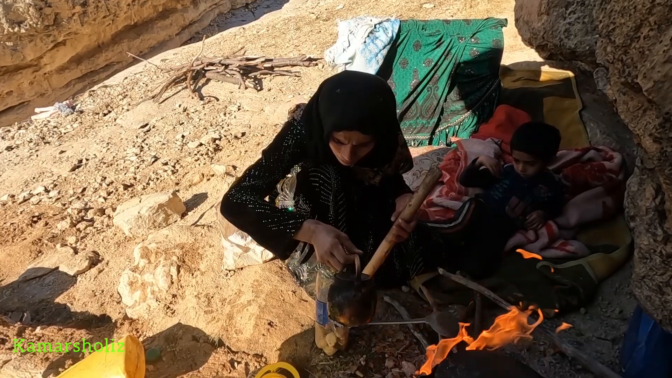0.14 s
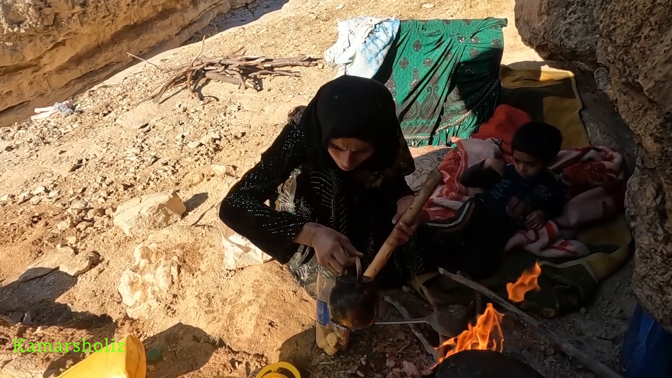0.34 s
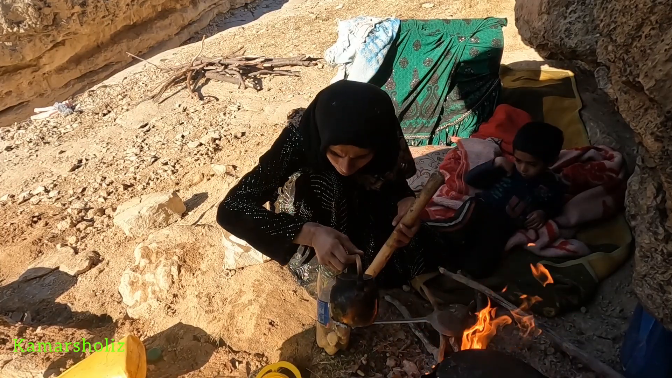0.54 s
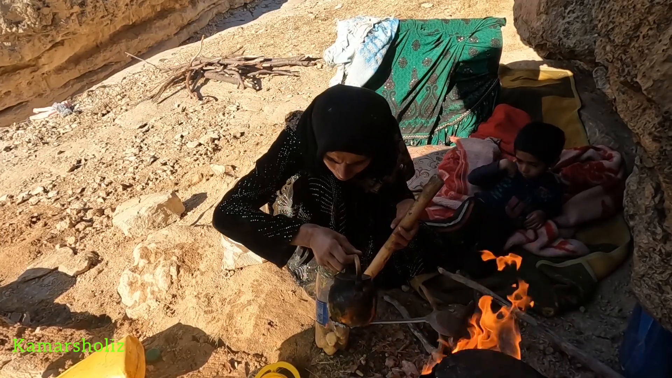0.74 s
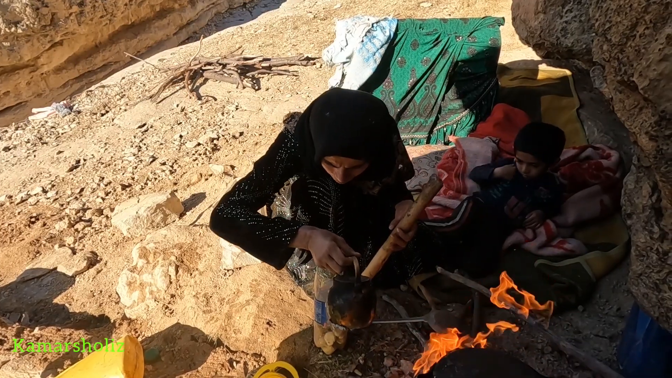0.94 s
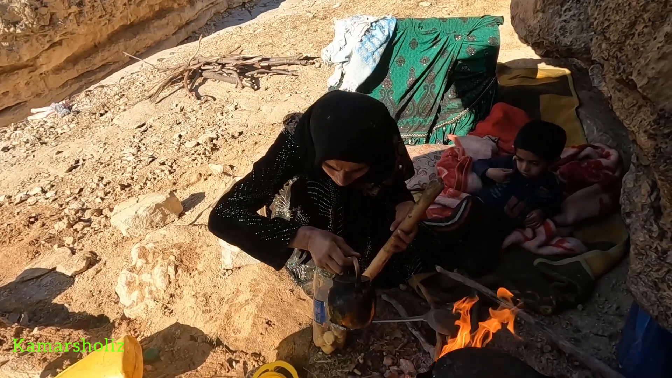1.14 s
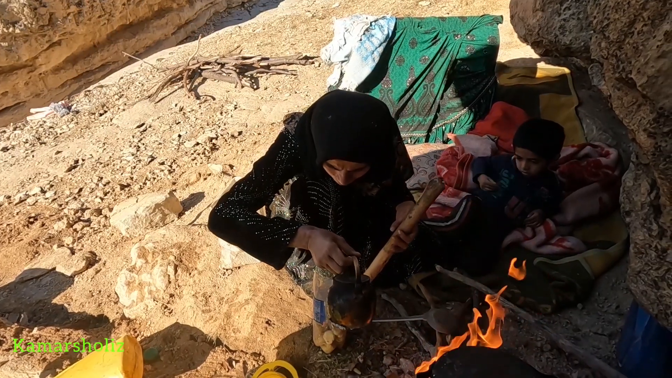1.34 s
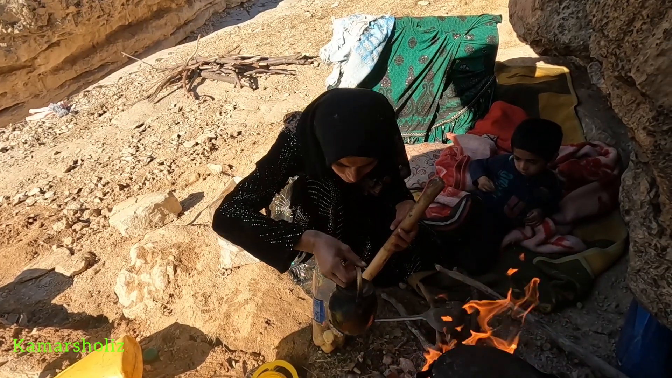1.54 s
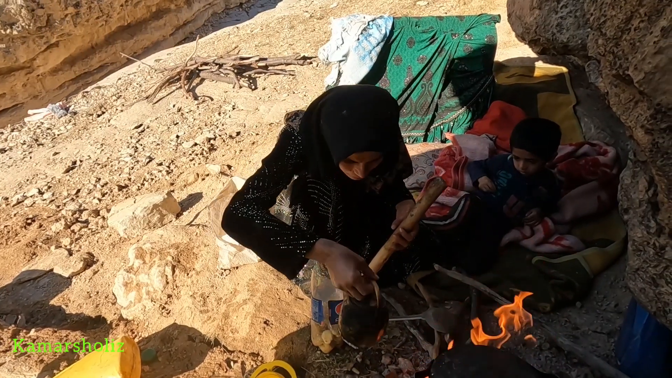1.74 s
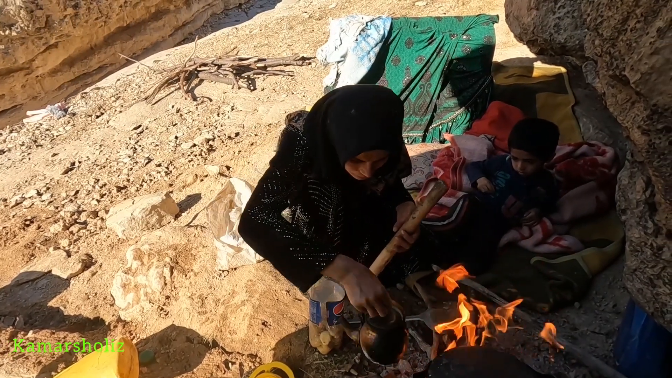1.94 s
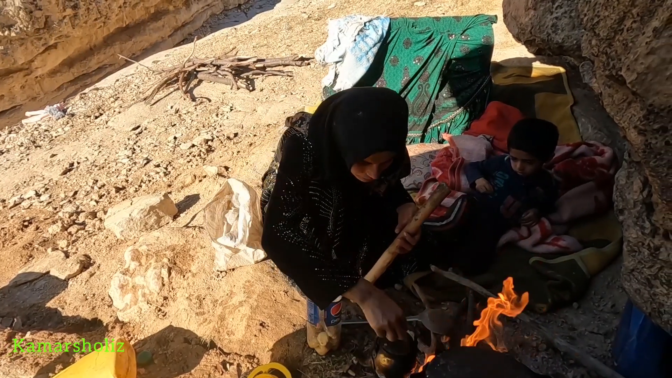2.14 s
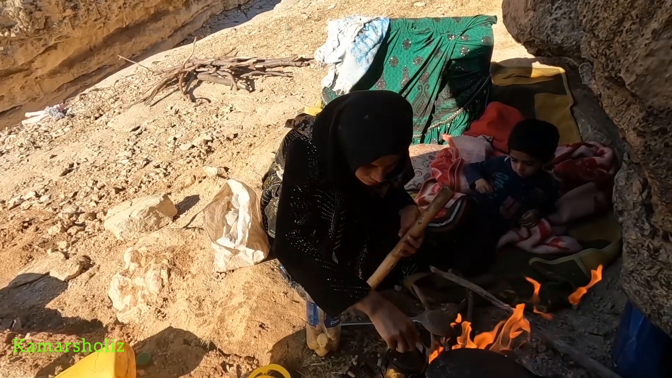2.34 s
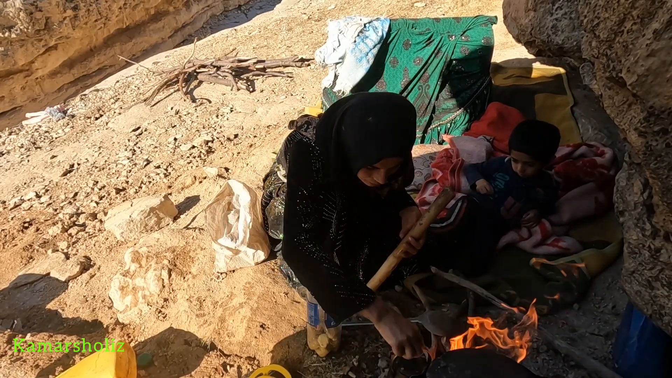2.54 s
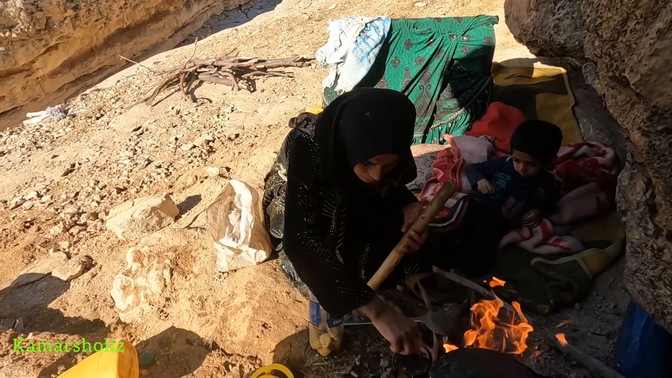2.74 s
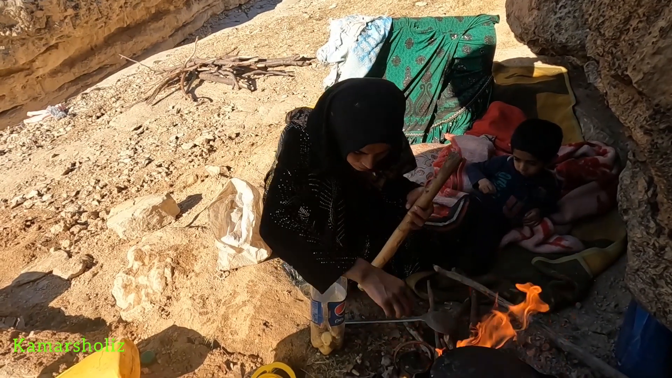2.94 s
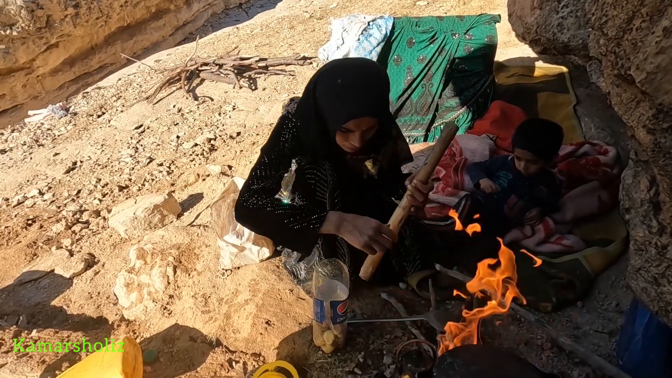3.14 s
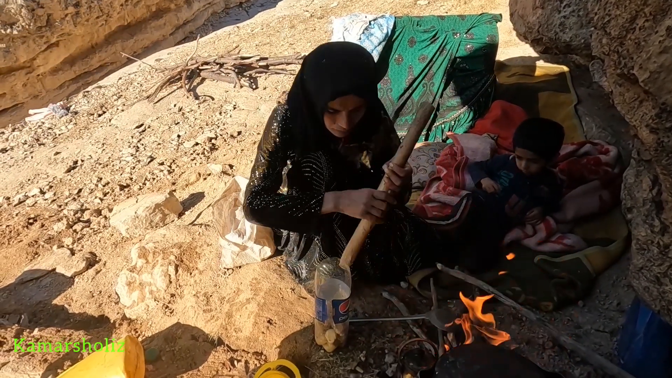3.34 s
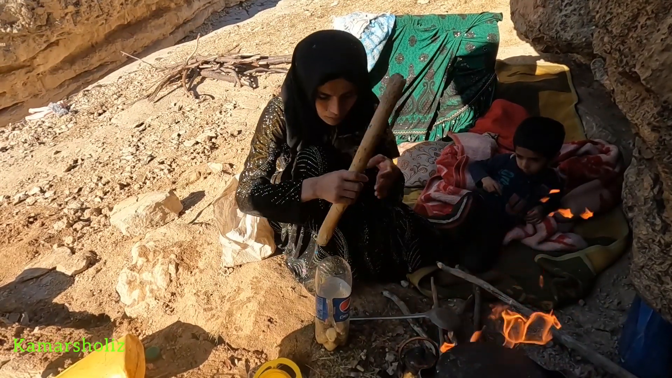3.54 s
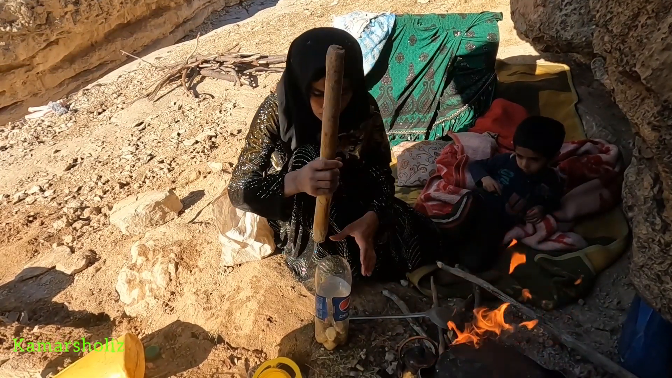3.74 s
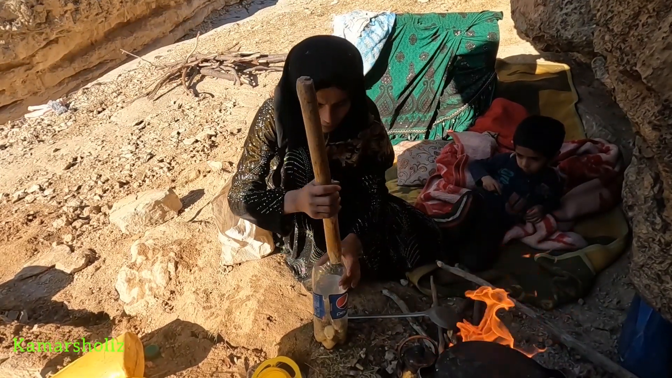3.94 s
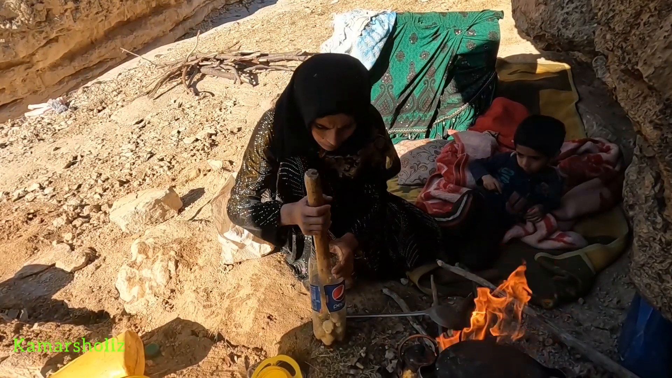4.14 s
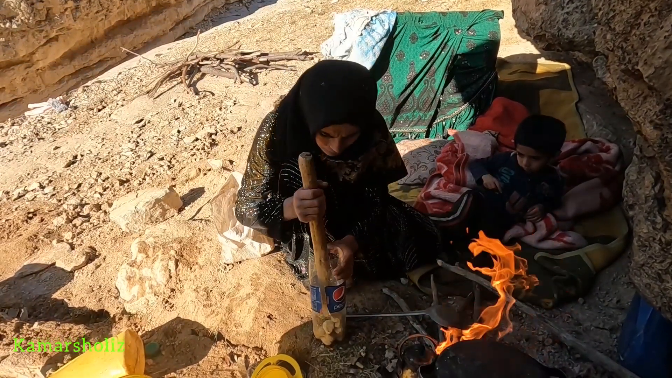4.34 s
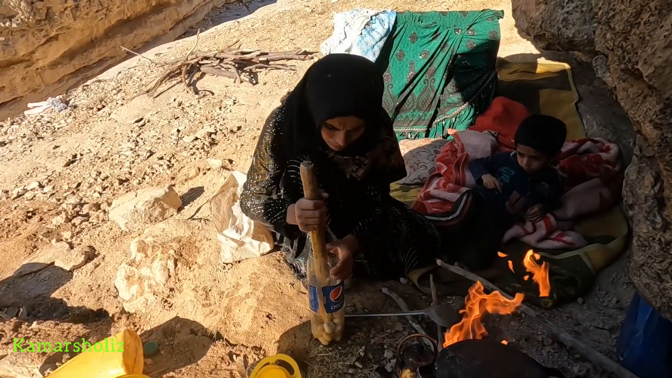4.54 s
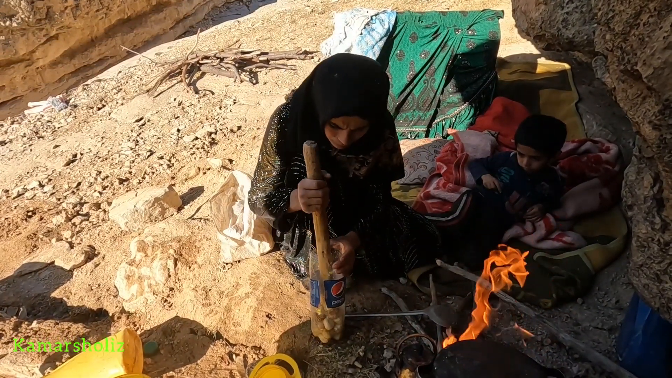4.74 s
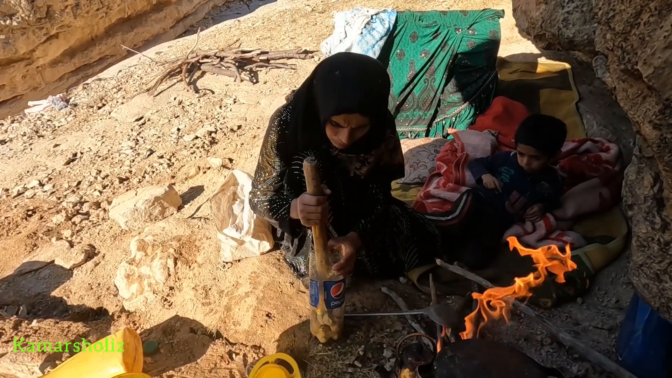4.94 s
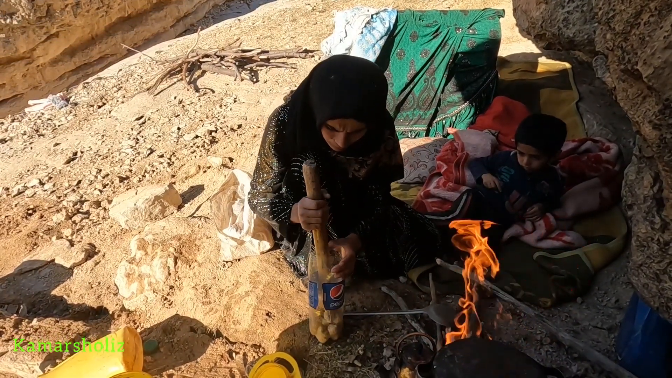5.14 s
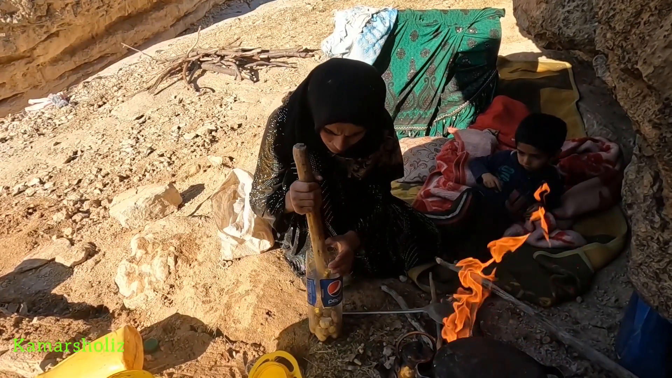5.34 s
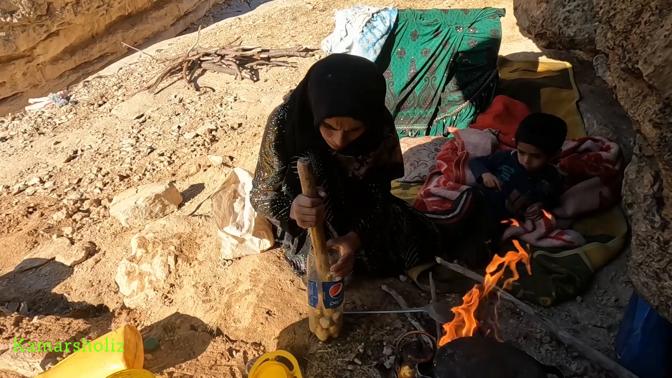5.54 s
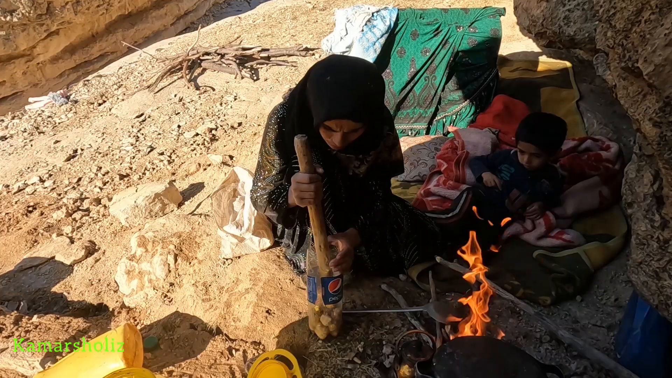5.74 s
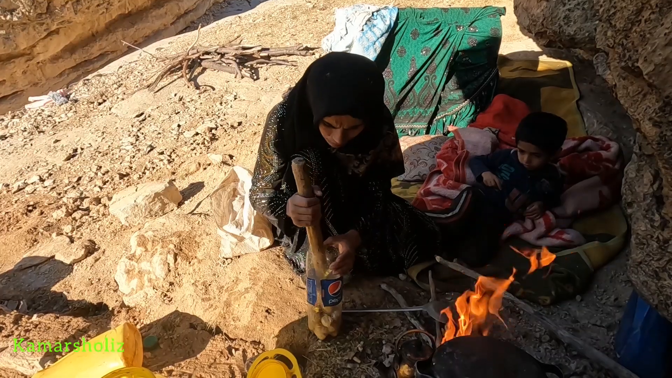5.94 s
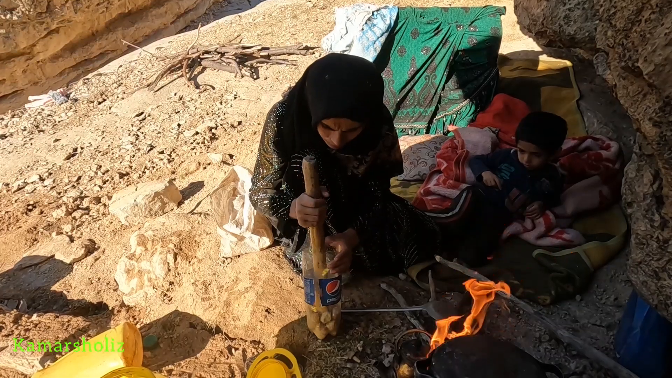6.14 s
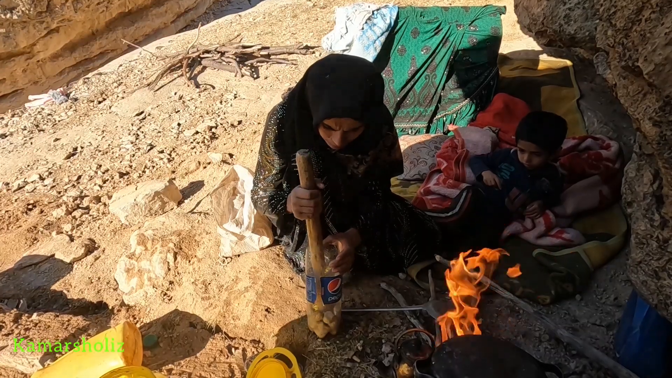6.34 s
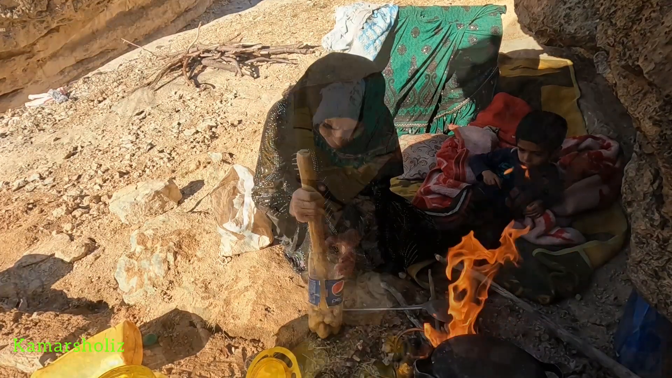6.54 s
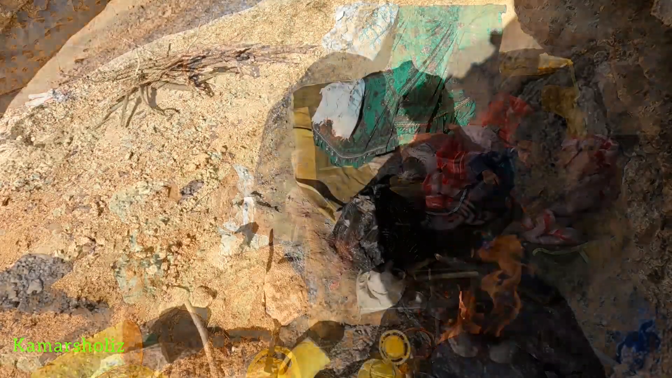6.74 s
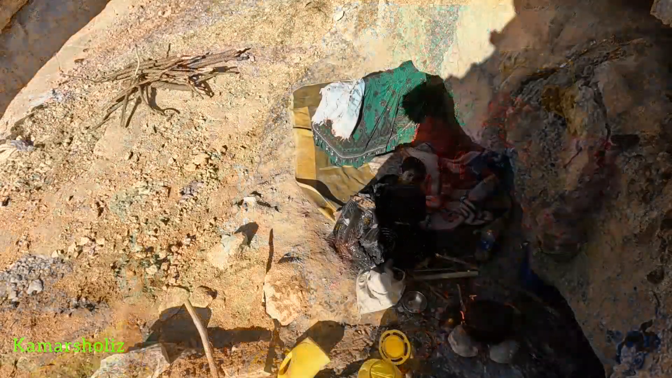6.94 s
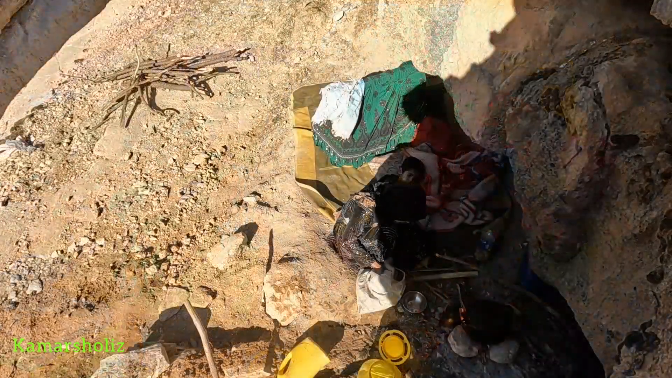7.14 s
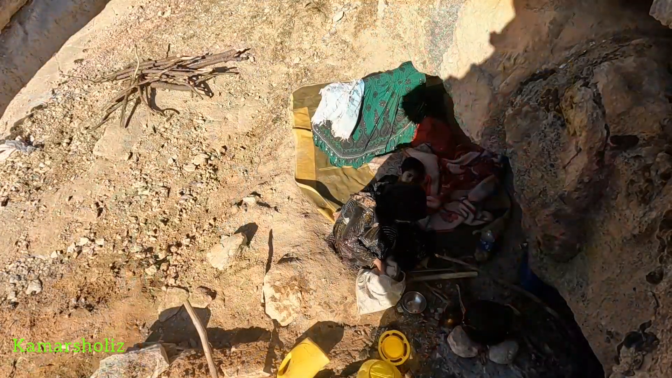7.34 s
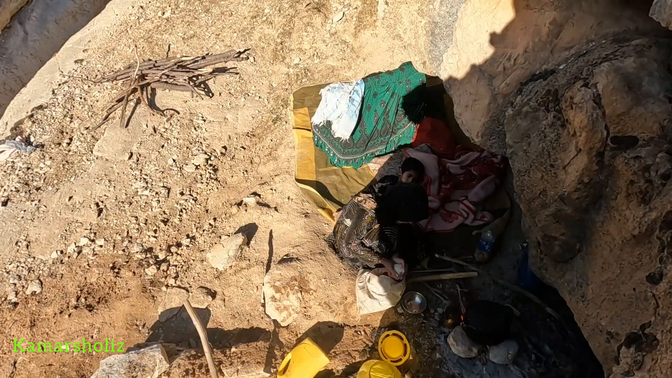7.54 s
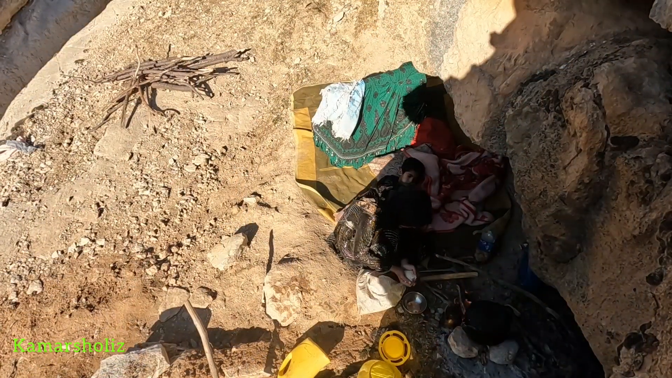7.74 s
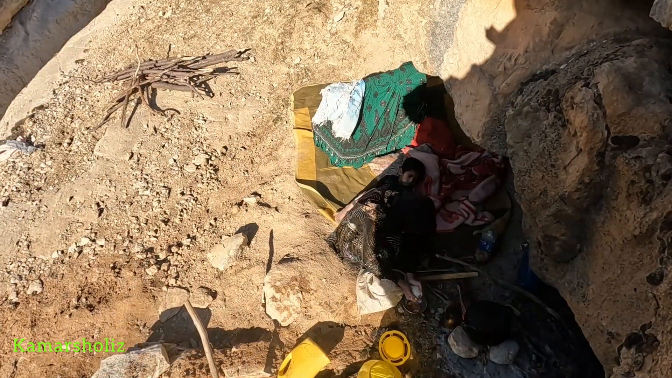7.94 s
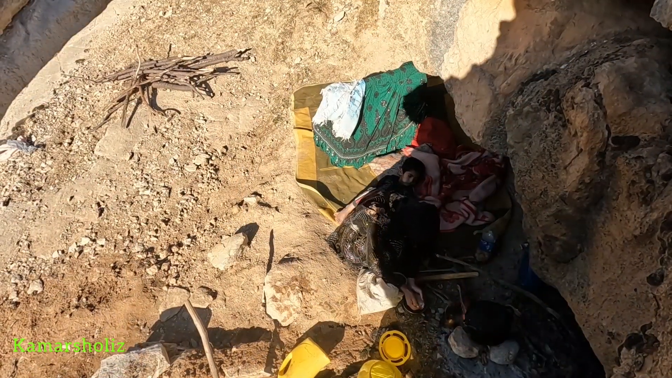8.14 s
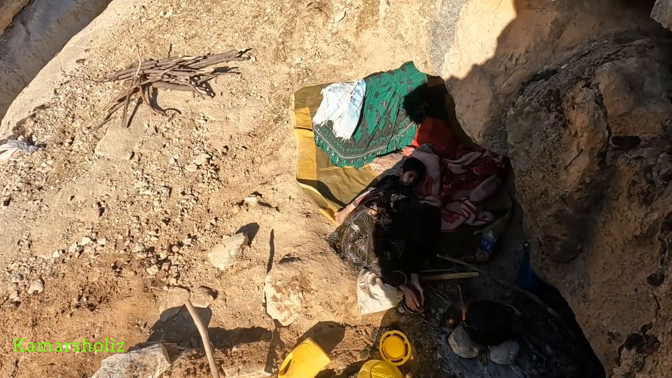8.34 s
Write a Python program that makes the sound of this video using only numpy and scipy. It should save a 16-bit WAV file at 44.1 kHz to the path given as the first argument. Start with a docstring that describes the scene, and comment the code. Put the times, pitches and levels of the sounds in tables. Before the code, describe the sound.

Crumbs and lumps patter from a metal ladle into a plastic bottle, then a wooden stick pounds them in crunchy hollow strokes beside a small fluttering fire.

```python
"""A wooden stick pounds food in a cut-open plastic bottle about three times a second, the last strokes fading.
Each stroke is a cluster of cracks and dense fractures that excite the bottle's wall and air-column resonances.
Before it, lumps and crumbs are tipped from a metal ladle, a shower of short taps; the ladle is put down with a clink.
A small wood fire under a rock overhang is coloured noise with ticks. Near the end the fire is fainter and the stereo
image narrower, with a faint hiss, two swishes of clothing, a dull bump and a dragged pot whose modes grit excites."""
import sys
import numpy as np
from scipy import signal
from scipy.fft import rfft, irfft
from scipy.io import wavfile
from scipy.ndimage import uniform_filter1d

SR = 44100
rng = np.random.default_rng(int(sys.argv[2]) if len(sys.argv) > 2 else 0)


def wav_record(signal):
    """Record a signal, one row per channel, as 16-bit PCM in the file named by sys.argv[1]."""
    frames = np.transpose(np.atleast_2d(signal))
    bounded = np.clip(frames, -1, 1)
    # unit amplitude maps onto the largest positive 16-bit level
    quanta = np.round(bounded * 32767).astype(np.int16)
    wavfile.write(sys.argv[1], SR, quanta)


N = 369558  # length of the scene in samples
SIZE = 4096  # length of impulse responses and short bursts in samples
EDGE_HZ = 15750  # upper limit of the band

# Strength of the fire. Each row: time in seconds, level in dB before FAINTER_DB is added.
FLAME_STRENGTH = [(0, -49), (.62, -40), (1.05, -51), (1.38, -42), (2.1, -49), (2.5, -41.5), (2.62, -33),
                  (2.76, -41), (3.22, -49), (3.42, -47.5), (3.8, -50.5), (3.95, -41), (4.15, -51)]
# Sharp ticks of burning twigs. Each row: time in seconds, peak in dB.
TWIG_TICKS = [(1.3433, -37), (2.917, -47.5), (3.0006, -36), (4.058, -45), (5.316, -36.5), (6.033, -43),
              (6.075, -39.5)]
# Spectra of the fire. Each row: frequency in Hz, relative spectral level in dB.
RUMBLE_COLOUR = [(12, -9), (30, 9), (60, -6), (130, -10.5), (250, -88)]
FLUTTER_COLOUR = [(50, -7.5), (110, 1), (165, 1), (230, -10.5), (370, -8.5), (560, -24.5), (2000, -69)]
HISS_SPECTRUM = [(200, -10), (700, -3), (1900, -4), (3300, -14), (7500, -7), (10700, -26), (12300, -23),
                 (15500, -44)]
# Rumble and hiss at the usual fire strength, and the dB by which each follows one dB of it
USUAL_FLAME_DB, RUMBLE_DB, RUMBLE_FOLLOWS, HISS_DB, HISS_FOLLOWS = -47, -38, 0.6, -70, 0.36
# The fire grows fainter as the stereo image closes: span, change of fire strength, change of the stereo difference
FADE_START_S, FADE_END_S, FAINTER_DB, NARROW_DB = 6.69, 7.07, -15.5, -20.5

# Flow of crumbs from the ladle. Each row: time in seconds, level in dB before POUR_DB is added.
CRUMB_FLOW = [(.04, -58), (.24, -56.5), (.36, -42), (.52, -51.5), (.76, -52), (.92, -46), (1.16, -48),
              (1.36, -46), (1.65, -43), (1.73, -54.5), (1.93, -55)]
POUR_DB, POUR_STOP_DB_PER_S = -5, 183
# Largest lumps dropping into the bottle. Each row: time in seconds, peak in dB, pitch of the tap in Hz.
LARGE_LUMPS = [(.303, -31.5, 2080), (.36, -35.5, 1180), (.376, -33, 1600), (.5715, -41, 4500),
               (.776, -37.5, 1870), (.879, -37.5, 2100), (1.104, -35, 1250), (1.184, -36.5, 3140),
               (1.229, -37.5, 2750), (1.376, -35.5, 1730), (1.459, -31, 980), (1.661, -38, 2280),
               (1.96, -33.5, 4650)]
SMALL_LUMP_COUNT, SMALL_LUMP_DB = 60, 10  # smaller lumps at random, up to this many dB above the flow
DUST_DB = -6.5  # fine dust against the flow
# Crumbs skittering in the ladle: level term, and share of its ring time left while it is held and full
SKITTER_DB, HELD_RING = -29, 0.044
# Modes of the freely ringing ladle bowl. Each row: frequency in Hz, relative level in dB, T60 in seconds.
LADLE_MODES = [(3990, -12, 0.23), (4360, -7, 0.24), (6320, -2, 0.14), (7780, 5.5, 0.087), (8660, 3, 0.08)]
# The ladle put down. Each row: time in seconds, peak of the ring in dB.
LADLE_CLINKS = [(2.8415, -46)]
# Hand and ladle brushing over dry ground. Each row: start in seconds, end in seconds, gain in dB.
GROUND_SCUFFS = [(2.39, 2.48, -61), (2.56, 2.67, -56), (3.37, 3.56, -67), (3.91, 4.1, -65)]
# Spectrum of that brushing. Each row: frequency in Hz, relative spectral level in dB.
SCUFF_SPECTRUM = [(1400, 3.5), (3200, -8), (6500, -0.5), (11000, -21.5)]

# Bottle resonances, the strongest near odd multiples of the air column's lowest note.
# Each row: frequency in Hz, width in Hz, level in dB over the wall sound before any ring_db.
BOTTLE_MODES = [(329.3, 25, 12), (363, 20.2, 18), (676, 30, 3.5), (1031.6, 67, 16), (1717, 73, 6),
                (2005, 52, -0.5), (2322, 100, 0), (2654, 190, 2.5), (3436, 34, 2)]
# Spectrum of the bottle's wall. Each row: frequency in Hz, gain in dB.
WALL_COLOUR = [(40, -3.5), (110, 2.5), (300, -3), (600, -6.5), (1100, -3.5), (2200, 1), (3200, -5.5),
               (4500, -9.5), (8000, -27), (9700, -44.5), (12000, -41.5), (15500, -54.5)]

# Stick scraping past the rim in two shoves. Each row: time in seconds, gain in dB, pitch of the rim in Hz.
RIM_SCRAPE = [(4.106, -97.5, 2150), (4.114, -45, 2260), (4.135, -39.5, 2630), (4.175, -44, 2190),
              (4.195, -31.5, 2230), (4.222, -47, 2200), (4.31, -100, 2200)]
# Resonances of the rim. Each row: multiple of its pitch, width in Hz, gain in dB.
RIM_RESONANCES = [(1, 140, 1.5), (1.95, 258.5, -4)]
# Spectrum of the grit on the rim. Each row: frequency in Hz, relative spectral level in dB.
RIM_GRIT_COLOUR = [(1000, -12.5), (4100, -2), (8000, -10), (10500, -26.5), (15500, -36)]
RIM_GRIT_DB = -5  # against the ringing

# Plastic wall buckling with a snap. Each row: time in seconds, peak in dB, pitch in Hz.
WALL_SNAPS = [(4.202, -22, 4000), (4.2056, -11.5, 4240), (4.44, -33.5, 4570), (4.918, -21, 4390),
              (4.942, -27, 4270)]
# Stick tapping the side as it is lifted. Each row: time in seconds, peak in dB, rebound in dB against the tap.
SIDE_TAPS = [(4.337, -30.5, -12), (4.412, -31, -26.5), (4.485, -36, -23), (4.644, -28.5, -6.5),
             (5.078, -24.5, -1), (5.357, -30.5, -7.5), (5.383, -23.5, -5), (5.992, -21, -8),
             (6.51, -32.5, -19)]
REBOUND_S = 0.0094
# Hollow bumps of the whole bottle. Each row: time in seconds, peak of the air tone in dB, pitch in Hz.
BOTTLE_BUMPS = [(4.441, -32.5, 385), (4.743, -28.5, 357), (4.81, -34, 365), (5.144, -28.5, 366)]
BUMP_RISE_S, BUMP_T60_S = 0.0041, 0.082

# Strokes of the stick into the filling. Each row: start in seconds, length in seconds, grinding level in dB,
# time it bottoms out in seconds, peak of the thud in dB.
STICK_STROKES = [(4.258, 0.023, -25.5, 4.276, -15.5), (4.531, 0.047, -23, 4.555, -19),
                 (4.871, 0.069, -22, 4.9, -18.5), (5.214, 0.068, -22.5, 5.25, -18),
                 (5.537, 0.067, -22.5, 5.555, -17), (5.898, 0.056, -22.5, 5.927, -16.5),
                 (6.254, 0.05, -21, 6.272, -14.5), (6.629, 0.025, -24, 6.634, -24.5),
                 (6.683, 0.043, -31, 6.7, -33.5), (6.996, .032, -36, 7.005, -36.5)]
# Hard pieces breaking under the strokes. Each row: time in seconds, peak in dB, pitch in Hz.
HARD_CRACKS = [(4.26, -16.5, 1550), (4.533, -19, 1700), (4.547, -14.5, 1200), (4.883, -13.5, 1050),
               (4.897, -15, 2000), (5.215, -15, 2050), (5.234, -16.5, 1900), (5.247, -13.5, 1300),
               (5.544, -16.5, 2200), (5.557, -15, 1100), (5.905, -15.5, 1900), (5.924, -13.5, 1350),
               (6.254, -14, 2200), (6.266, -13.5, 2300), (6.631, -23, 2100), (6.699, -22.5, 1750)]
CRACK_PUSH_DB = -11  # push on the air column against its crack
# Stick drawn up along the wall: wait after a stroke, pause before the next, gain against that stroke's grinding
LIFT_WAIT_S, LIFT_PAUSE_S, LIFT_DB = .012, 0.036, -22.5
# Stick chattering along the wall, sounding the air column's second note.
# Each row: start in seconds, end in seconds, gain in dB.
WALL_CHATTERS = [(4.77, 4.84, -40), (5.182, 5.22, -28)]
CHATTER_HZ, CHATTER_WIDTH_HZ = 1045, 60

# A faint hiss, then two swishes of clothing. Each row: start in seconds, end in seconds, gain in dB.
HISS_AND_SWISHES = [(6.7, 7.75, -68.5), (7.81, 8.06, -55.5), (8, 8.43, -55.5)]
# Spectrum of both, also used under the pot. Each row: frequency in Hz, relative spectral level in dB.
SWISH_COLOUR = [(300, 0), (1400, -2.5), (2800, 6), (6000, -7.5), (8500, -18), (11500, -6.5), (15500, -17)]
BUMP_S, BUMP_DB = 7.822, -32.5  # a dull bump close to the microphone: time and peak
# Modes of the dragged pot. Each row: mean frequency in Hz, gain in dB, nominal T60 in seconds.
POT_MODES = [(1970, -2, .04), (2360, -4, .03), (2750, 7.5, .03), (3850, -3, .02), (5770, 2, .06)]
DRAG_START_S, DRAG_END_S, DRAG_DB = 8.05, 8.28, -46  # gain of the drag

# Reverberation of the overhang. Each row: frequency in Hz, T60 in seconds.
SHELTER_DECAY = [(150, 0.87), (1000, 0.086), (8000, 0.41)]
SHELTER_DB = -14.0  # scatter against the direct sound
# Microphone pair. Each row: frequency in Hz, left lead in radians, left-right difference in dB, likeness from 0 to 1.
PORT_RELATION = [(200, 0, .2, .98), (1100, -.3, .3, .99), (2100, -.8, 2.5, .98), (3000, -1.9, -1.5, .9),
                 (3400, -.15, -3, .98), (4600, -.1, 1, .98), (8500, -.8, 2.5, .75), (12000, -.8, 7, .5)]


def amp(db):
    """The decibel law: amplitude ratio of a level."""
    return 10 ** (np.asarray(db) / 20)


def unit(x):
    """Normalization to unit root-mean-square value."""
    return x / np.sqrt(np.mean(x ** 2) + 1e-20)


def read(points, hz, axis=1):
    """Interpolation of a spectrum along logarithmic frequency."""
    points = np.asarray(points)
    return np.interp(np.log(hz + 1), np.log(points[:, 0] + 1), points[:, axis])


def level(curve):
    """Linear interpolation of a time curve at every sample, holding its ends."""
    return np.interp(np.arange(N) / SR, *np.transpose(curve))


def add(mix, s, sound):
    """Superposition of a sound on the mix, beginning at s seconds."""
    start = max(round(s * SR), 0)
    part = mix[:, start:][:, :sound.shape[1]]
    part += sound[:, :part.shape[1]]


def drift(per_s):
    """Slow random modulation of unit size: straight lines between per_s random values a second."""
    at = np.arange(N) / SR * per_s
    return unit(np.interp(at, np.arange(SIZE), rng.standard_normal(SIZE)))


def colour(points):
    """Minimum phase: the Hilbert transform of log gain gives a causal response of that spectrum."""
    log_gain = np.log(amp(read(points, abs(np.fft.fftfreq(SIZE, 1 / SR)))))
    return np.fft.ifft(np.exp(np.conj(signal.hilbert(log_gain)))).real


def through(x, response):
    """Convolution: a linear system's output from its impulse response."""
    return signal.fftconvolve(x, np.atleast_2d(response), axes=1)[:, :x.shape[1]]


def band(x, lo_hz, hi_hz):
    """Band-pass filtering between two corner frequencies."""
    edges = [lo_hz, min(hi_hz, SR / 2 - 1)]
    return signal.sosfilt(signal.butter(2, edges, "band", fs=SR, output="sos"), x)


def resonate(x, hz, width_hz):
    """Heterodyning: a resonance of gain 1 that can follow a pitch curve."""
    turn = np.exp(2j * np.pi * np.cumsum(hz * np.ones(N)) / SR)
    r = np.exp(-np.pi * width_hz / SR)
    return 2 * (turn * signal.lfilter([1 - r], [1, -r], x / turn)).real


def pair(z):
    """Partial coherence: two unrelated signals become what two close ports hear, more alike in the bass."""
    hz = np.fft.rfftfreq(z.shape[1], 1 / SR)
    a, b = rfft(z)
    same = np.clip(read(PORT_RELATION, hz, axis=3), 0, 1)
    common = a * np.sqrt((1 + same) / 2)
    apart = b * np.sqrt((1 - same) / 2)
    # half the level and phase difference goes to each side
    lean = amp(read(PORT_RELATION, hz, axis=2) / 2) * np.exp(.5j * read(PORT_RELATION, hz))
    return irfft(np.array([(common + apart) * lean, (common - apart) / lean]), z.shape[1])


def noise(points):
    """Filtered noise: a steady random signal of the given spectrum at both ports."""
    return unit(through(pair(rng.standard_normal((2, N))), colour(points)))


def grains(count, per_s, spread_db):
    """Random impulses: tiny clicks over count samples, a few much larger than the rest."""
    size = amp(spread_db * np.minimum(rng.exponential(1, (2, count)), 4))
    sign = rng.choice([-1, 1], (2, count))
    return pair(size * sign * (rng.random((2, count)) < per_s / SR))


def crack(t60, crumble_db):
    """Impulsive fracture: a burst of a few milliseconds, then crumbling that decays over t60 seconds."""
    t = np.arange(SIZE) / SR
    burst = amp(-60 * t / .014) * np.minimum(t / .0004, 1)
    return pair(rng.standard_normal((2, SIZE)) * (burst + amp(crumble_db - 60 * t / t60)))


def peaked(x, db, size=60):
    """Peak scaling: the largest short-term power (over size samples) is brought to the given level."""
    return x * amp(db) / np.sqrt(uniform_filter1d(x.mean(0) ** 2, size).max() + 1e-20)


def swells(rows):
    """Amplitude envelope that rises and falls smoothly over each (start, end, dB) row."""
    out = np.zeros((1, N))
    for start, end, db in rows:
        shape = signal.windows.tukey(max(int((end - start) * SR), 2), .7)
        add(out, start, amp(db) * shape[None])
    return out


def patchy(x, depth_db):
    """Contact modulation: colour keeps changing in random patches, about 200 Hz by 40 ms."""
    z = signal.stft(x, nperseg=512, noverlap=384)[2]
    patch = np.outer(np.hanning(5), np.hanning(22))
    field = signal.oaconvolve(rng.standard_normal(z.shape[1:]), patch, "same")
    gain = unit(amp(depth_db * unit(field)))
    return signal.istft(z * gain, nperseg=512, noverlap=384)[1][:, :N]


def fire():
    """Combustion noise: flutter, rumble, hiss and crackle follow one strength curve; twigs tick."""
    flame_db = level(FLAME_STRENGTH) + level([(FADE_START_S, 0), (FADE_END_S, FAINTER_DB)])
    flare_db = flame_db - USUAL_FLAME_DB
    lumpy = amp(2 * drift(12) - .5)
    out = noise(RUMBLE_COLOUR) * amp(RUMBLE_DB + RUMBLE_FOLLOWS * flare_db) * lumpy
    out += noise(FLUTTER_COLOUR) * amp(flame_db) * amp(2.5 * drift(22) - 1)
    hiss = noise(HISS_SPECTRUM) * amp(1.3 * drift(25))
    bursts = through(grains(N, 110, 3), crack(.04, -15)[:1])
    crackle = unit(through(bursts, colour(HISS_SPECTRUM)))
    out += (hiss + crackle / 2) * amp(HISS_DB + HISS_FOLLOWS * flare_db)
    for s, db in TWIG_TICKS:
        add(out, s, peaked(band(crack(0.089, -14.0), 500, 5650), db))
    return out


def bottle(tuning=1, ring_db=0):
    """Modal superposition: impulse response of the thin wall together with the ringing air column."""
    t = np.arange(SIZE) / SR
    response = (t == 0).astype(float)
    for hz, width, db in BOTTLE_MODES:
        size = amp(db + ring_db) * 2 * np.pi * width / SR
        response += size * np.exp(-np.pi * width * t) * np.cos(2 * np.pi * hz * tuning * t)
    return through(response[None], colour(WALL_COLOUR))


def bowl(ring_share=1):
    """Modal decay: impulse response of the ladle's bowl, with ring times multiplied by ring_share."""
    t = np.arange(2 * SIZE) / SR
    return sum(amp(db - 60 * t / (t60 * ring_share)) * np.sin(2 * np.pi * hz * t)
               for hz, db, t60 in LADLE_MODES)


def crumbs(per_s, spread_db, tilt_db):
    """Impact ringing: each bit taps a few cycles at its own pitch; small bits gain tilt_db an octave."""
    t, taps = np.arange(SIZE // 8) / SR, np.zeros((2, N))
    pitches = np.geomspace(900, 11000, num=18)
    for hz in pitches:
        size = amp(spread_db * np.minimum(rng.exponential(1, N), 3))
        falls = (rng.random(N) < per_s / len(pitches) / SR) * size
        tap = np.exp(-t * hz / 6) * np.sin(2 * np.pi * hz * t)
        tilt = amp(tilt_db * np.log2(hz / pitches[0]))
        taps[0] += signal.oaconvolve(falls, unit(tap))[:N] * tilt
    return unit(pair(taps))


def lump(body, db, hz):
    """Impact excitation: one landing is a short tap with its own pitch, filtered by the bottle."""
    blow = crack(.04, -11)
    return peaked(through(band(blow, hz / 1.15, hz * 1.15) + .17 * blow, body), db)


def pouring():
    """Granular flow: crumbs skitter off the ladle and tumble into the bottle, among lumps of all sizes."""
    first_s, last_s = CRUMB_FLOW[1][0], CRUMB_FLOW[-1][0]
    body = bottle(ring_db=1.0)
    empty_s = np.maximum(np.arange(N) / SR - last_s, 0)
    flow = amp(level(CRUMB_FLOW) + POUR_DB - POUR_STOP_DB_PER_S * empty_s)
    landing = unit(through(crumbs(750, 4.7, 1.2), body)) * flow
    skitter = unit(band(through(grains(N, 260, 5), bowl(HELD_RING)), 2500, 5200))
    skitter *= flow ** 0.54 * amp(SKITTER_DB)  # even a thin trickle skitters
    # soft landings stir the air column
    hollow = unit(band(through(grains(N, 60, 8.4), body), 250, 402)) * flow * amp(-2.5)
    dust = unit(through(grains(N, 5000, 2.5), colour(HISS_SPECTRUM))) * flow * amp(DUST_DB)
    out = (landing + skitter + hollow + dust) * amp(2.5 * drift(55) - 1)  # clumps
    for s, db, hz in LARGE_LUMPS:
        add(out, s, lump(body, db, hz))
    for when, size, pitch in rng.random((SMALL_LUMP_COUNT, 3)):
        s = first_s + when * (last_s - first_s)
        hz = 1050 * 4.2 ** pitch
        add(out, s, lump(body, SMALL_LUMP_DB * size, hz) * flow[round(s * SR)])
    return out


def scuffing():
    """Friction noise: hand and ladle brush over dry ground in short swells."""
    return noise(SCUFF_SPECTRUM) * swells(GROUND_SCUFFS)


def ladle():
    """Damped modal ringing: the bowl clinks as it is put down, with a lower noisy knock."""
    out = np.zeros((2, N))
    for s, db in LADLE_CLINKS:
        add(out, s, peaked(pair(np.outer([1, 0], bowl())), db))
        add(out, s, peaked(band(crack(0.13, -1), 470, 3500), db + 4))
    return out


def scraping():
    """Slip excitation: slips at the mouth ring the rim, whose pitch bends as the stick presses on it."""
    curve, slips = np.array(RIM_SCRAPE), grains(N, 1800, 3.6)
    hz = level(curve[:, [0, 2]])
    ring = unit(sum(amp(db) * resonate(slips, hz * k, width) for k, width, db in RIM_RESONANCES))
    grit = unit(through(slips, colour(RIM_GRIT_COLOUR)))
    return (ring + amp(RIM_GRIT_DB) * grit) * amp(level(curve[:, :2]))


def boom(body, db):
    """Air-column resonance: a push on the bottle, heard in its low band."""
    return peaked(band(through(crack(0.017, -18.0), body), 110, 470), db)


def clack(body, db):
    """Wall impact: wood striking the side of the bottle."""
    return peaked(band(through(crack(0.083, -17), body), 640, 3200), db)


def snap(db, hz):
    """Buckling: the thin wall clicks in or out, a narrow band over a weaker broad one."""
    click = crack(.07, -25)
    broad = band(band(click, 2000, 7500), 1500, 9000)
    return peaked(band(click, hz / 1.15, hz * 1.15) + 0.33 * broad, db)


def knocking():
    """Impact and rebound: the stick taps the side, bumps the bottle and buckles its wall."""
    out, t = np.zeros((2, N)), np.arange(2 * SIZE) / SR
    for s, db, rebound_db in SIDE_TAPS:
        body = bottle(1 + .02 * rng.standard_normal(), ring_db=1.0)
        add(out, s, clack(body, db) + boom(body, db - 12.0))
        add(out, s + REBOUND_S, clack(body, db + rebound_db))
    for s, db, hz in BOTTLE_BUMPS:
        envelope = (1 - np.exp(-t / BUMP_RISE_S)) * amp(-60 * t / BUMP_T60_S)
        air = envelope * np.sin(2 * np.pi * hz * t)
        add(out, s, peaked(air[None], db))
        add(out, s, clack(bottle(ring_db=6), db - 4.5))
    for s, db, hz in WALL_SNAPS:
        add(out, s, snap(db, hz))
    return out


def crushing():
    """Dense fracture: the stick grinds in, breaks the filling and settles, duller as the filling packs."""
    out, lead = np.zeros((2, N)), .045  # seconds of rise before each stroke
    t = np.arange(round(.35 * SR)) / SR - lead
    for s, length, db, *_ in STICK_STROKES:
        u = t / length  # progress, 0 to 1 over the stroke
        push = np.clip(u / 0.14, 0, 1) * amp(-45 * np.maximum(u - .7, 0))
        grind = amp(-14.0 + 450 * np.minimum(t, 0) - 250 * np.maximum(t - length, 0))
        fine = grains(len(t), 5000, 4.5)
        packed = np.clip(u, 0, 1)
        dulled = fine * (1 - 0.78 * packed) + 0.87 * packed * band(fine, 48, 1500)
        drive = (push + grind) * dulled
        drive += 2.0 * grind * (1 - packed) * band(fine, 5000, 15000)
        sound = through(drive, bottle(1 + 0.017 * rng.standard_normal(), ring_db=-1.5))
        during = (u > 0) & (u < 1)
        add(out, s - lead, sound * amp(db) / sound.mean(0)[during].std())
    return out


def pounding():
    """Impulse response: hard pieces crack, then the stick bottoms out in a bottle detuned a little each time."""
    out = np.zeros((2, N))
    for s, db, hz in HARD_CRACKS:
        blow = band(through(crack(0.045, -15.5), bottle()), hz / 1.48, hz * 1.36)
        add(out, s, peaked(blow, db) + boom(bottle(), db + CRACK_PUSH_DB))
    for *_, s, db in STICK_STROKES:
        add(out, s, boom(bottle(1 + .03 * rng.standard_normal(), ring_db=2.5), db))
    return out


def lifts():
    """Amplitude envelope of the rubbing while the stick is drawn up between strokes."""
    rows = []
    for (s, length, *_), (next_s, _, next_db, *_) in zip(STICK_STROKES, STICK_STROKES[1:]):
        rows.append((s + length + LIFT_WAIT_S, next_s - LIFT_PAUSE_S, next_db + LIFT_DB))
    return swells(rows)


def rubbing():
    """Slip excitation: wood slides over plastic inside the bottle, dislodges crumbs and now and then chatters."""
    slips = grains(N, 3000, 2.8)
    loose = unit(through(crumbs(220, 5, -1.5), bottle()))
    bright = slips + 2 * band(slips, 5000, 14000)
    inside = unit(through(bright, bottle())) * amp(2 * drift(70) - .5)
    once = resonate(slips, CHATTER_HZ, CHATTER_WIDTH_HZ)
    chatter = unit(resonate(once, CHATTER_HZ, 2 * CHATTER_WIDTH_HZ))
    return (.7 * inside + .65 * loose) * lifts() + (chatter + .4 * inside) * swells(WALL_CHATTERS)


def handling():
    """Filtered noise and impact: a faint hiss, two brighter swishes of clothing, and a low-passed bump."""
    swish, loudness = noise(SWISH_COLOUR), swells(HISS_AND_SWISHES)
    fizz = signal.sosfiltfilt(signal.butter(4, 8500, "high", fs=SR, output="sos"), swish)
    brightened = swish - fizz + fizz * np.sqrt(loudness / amp(-57))  # the louder, the brighter
    out = patchy(brightened, 3) * loudness * amp(1.5 * drift(80))
    bump = band(band(np.eye(1, SIZE), 42, 184), 13, 700)
    add(out, BUMP_S, peaked(bump, BUMP_DB))
    return out


def pot():
    """Friction-driven modes: grit rings the pot, whose modes waver as the contact shifts, over a hiss."""
    grit, tuning = grains(N, 2000, 3), 1 + .015 * drift(30)
    ring = sum(amp(db) * resonate(grit, hz * tuning, 2.2 / t60) for hz, db, t60 in POT_MODES)
    drag = swells([(DRAG_START_S, DRAG_END_S, DRAG_DB)])
    return (unit(ring) + .7 * noise(SWISH_COLOUR)) * drag * amp(2 * drift(50))


def shelter(x):
    """Diffuse reflection: short scatter from ground and rock, with a decay time for each frequency."""
    count = SR // 2
    taps = rng.standard_normal((2, count)) * (rng.random((2, count)) < 3000 / SR)
    taps *= np.arange(count) > .005 * SR  # nothing returns within 5 ms
    hz, t, z = signal.stft(pair(taps), SR, nperseg=256)
    decay = amp(-60 * t / read(SHELTER_DECAY, hz)[:, None])
    tail = signal.istft(z * decay, SR, nperseg=256)[1]
    return through(x, tail / np.linalg.norm(tail[0]))


def narrowed(x):
    """Mid-side reduction: the stereo image closes to the centre below 9 kHz near the end."""
    side = (x[0] - x[1]) / 2
    lower = signal.sosfiltfilt(signal.butter(4, 9000, fs=SR, output="sos"), side)
    lost = 1 - amp(level([(FADE_START_S, 0), (FADE_END_S, NARROW_DB)]))
    return x - np.outer([1, -1], lost * lower)


def scene():
    """Superposition of all sources, the near ones also scattered by the shelter."""
    sliding = patchy(pouring() + rubbing(), 3.5)
    near = sliding + ladle() + scraping() + knocking() + crushing() + pounding()
    ground = patchy(scuffing() + pot(), 4)
    return narrowed(fire() + near + amp(SHELTER_DB) * shelter(near) + handling() + ground)


def record(dry):
    """Band limitation: a linear-phase low-pass filter removes the highest treble."""
    low_pass = signal.firwin(511, EDGE_HZ, window=("kaiser", 9), fs=SR)
    return signal.oaconvolve(dry, low_pass[None], "same")


dry = scene()
out = record(dry)
wav_record(out)
```